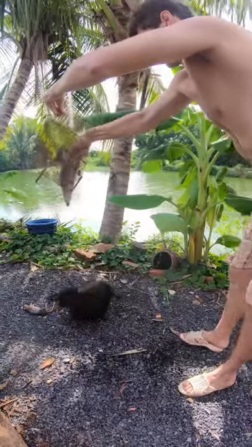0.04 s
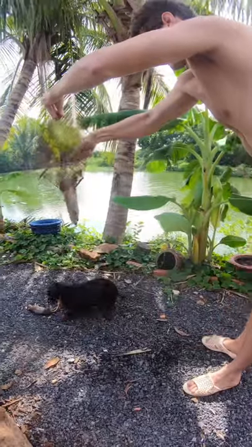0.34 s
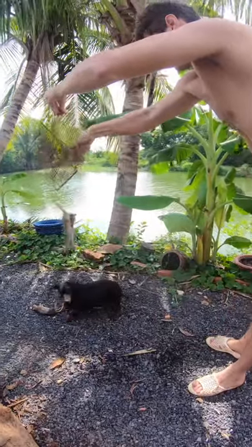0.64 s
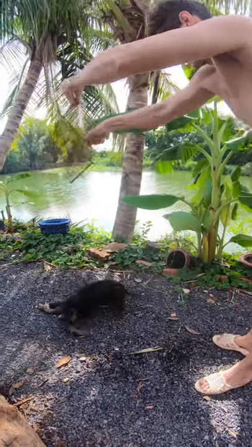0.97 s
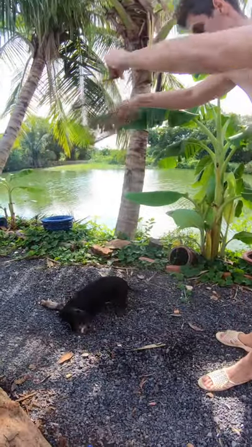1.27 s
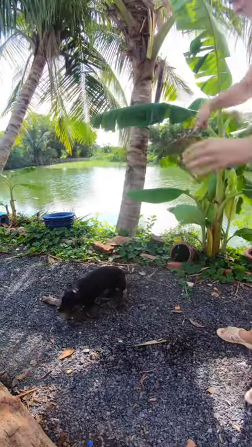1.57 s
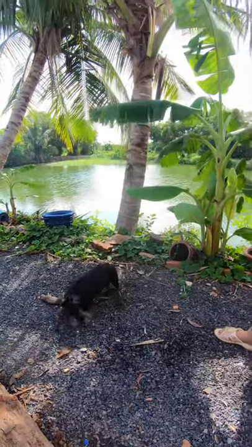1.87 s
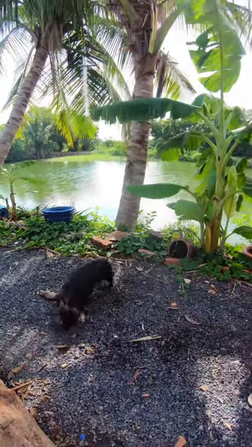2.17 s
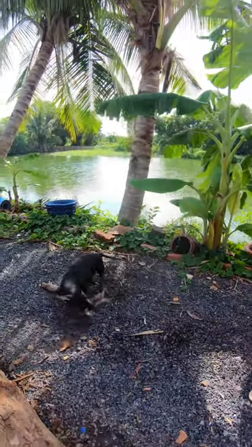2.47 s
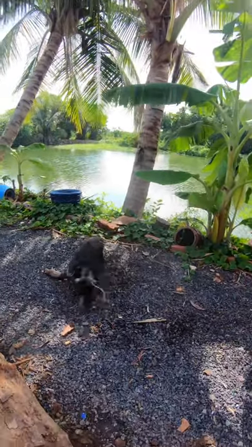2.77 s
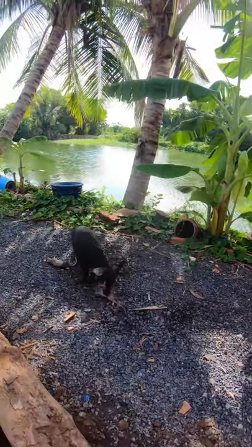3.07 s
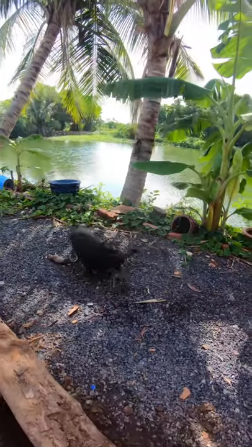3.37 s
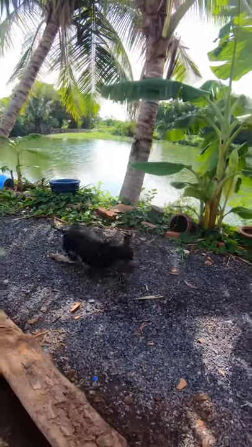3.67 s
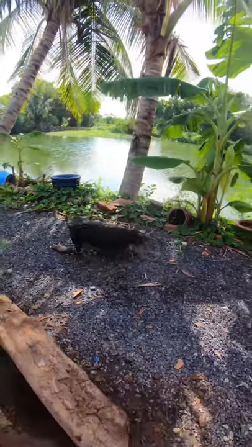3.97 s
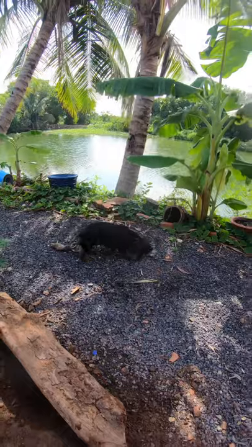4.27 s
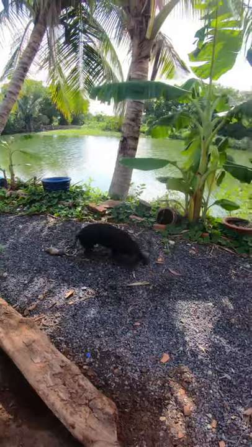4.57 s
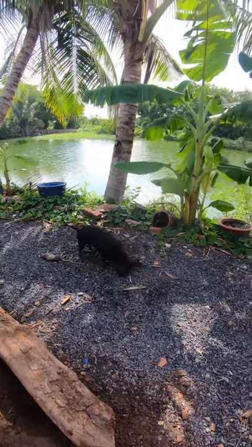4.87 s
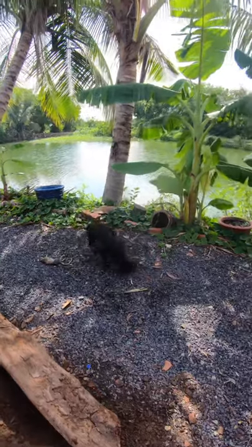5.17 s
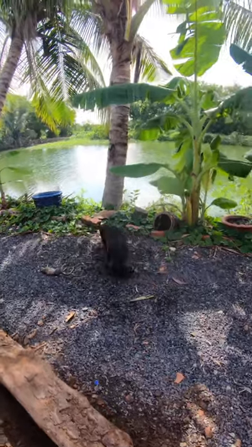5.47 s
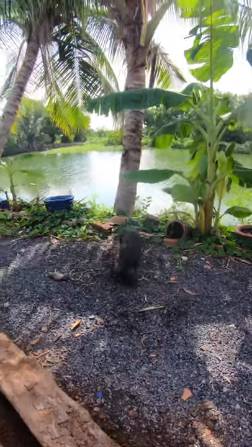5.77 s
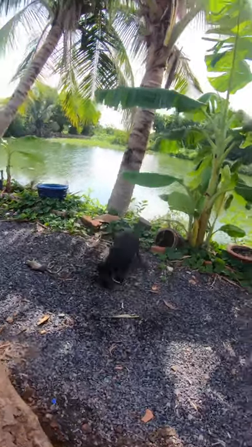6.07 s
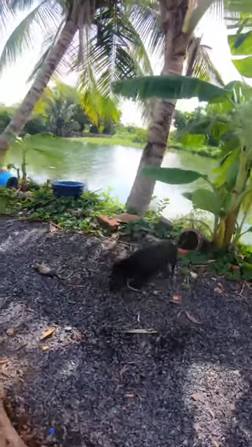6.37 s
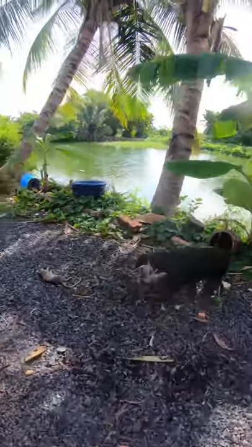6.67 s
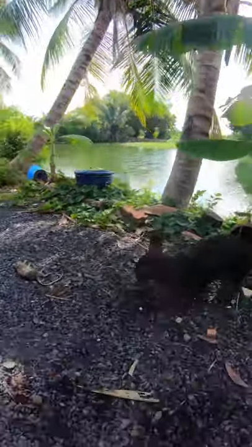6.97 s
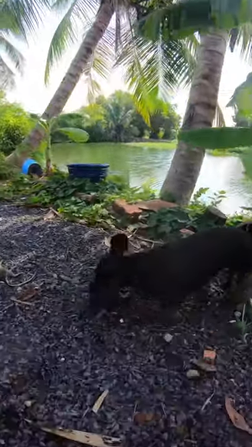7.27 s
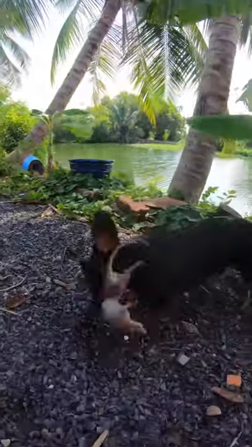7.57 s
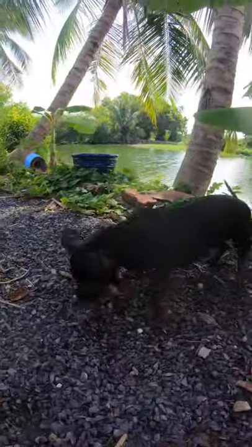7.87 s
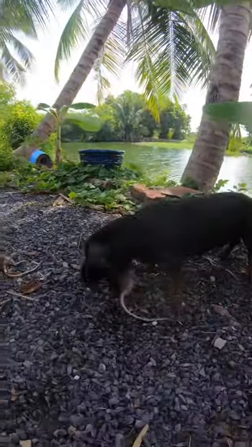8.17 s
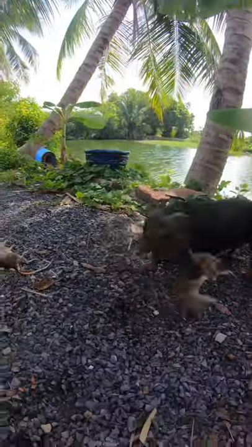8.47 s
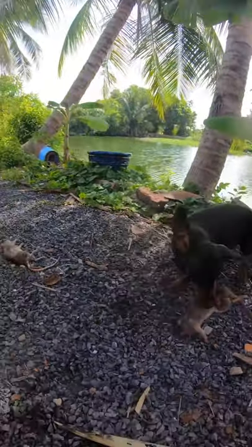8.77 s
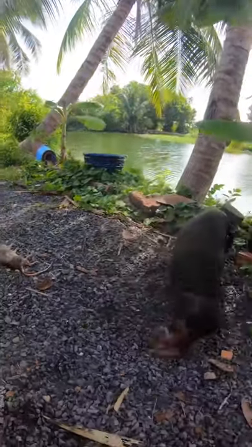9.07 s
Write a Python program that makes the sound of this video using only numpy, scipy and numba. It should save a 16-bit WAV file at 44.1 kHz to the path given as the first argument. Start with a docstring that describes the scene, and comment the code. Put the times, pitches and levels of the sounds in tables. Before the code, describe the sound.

A small dog fights a rat on a gravel path, a few steps from a hand-held phone and slightly left, over a quiet low rumble and a hush of foliage. Paws crunch lightly on gravel and dry leaves throughout. At about 1.1 seconds the rat gives a burst of high, hoarse squeals, followed by sharp clicks of bites and flung stones until 2 seconds. More raspy squeals come from 2 to 3.4 seconds, with scattered clicks and a soft thud. From about 4.7 to 6.2 seconds the cries are weaker, with tiny whistling notes. Around 5.7 to 6.2 seconds a finger rubs and bumps the phone's case, and the rumble swells briefly. From 6.6 to 7.8 seconds come dense sharp clicks, gravel scuffs and a few clipped squeaks. After a short lull, another flurry of clicks, scuffs and soft body thuds runs from 8.4 to 9 seconds, with faint last squeaks.

```python
"""Dog shaking a rat on gravel

A small dog seizes a rat on a gravel path and shakes it, a few steps from a hand-held phone.
The rat squeals hoarsely, then more weakly: irregular vocal pulses excite a throat resonance.
Bites and flung stones click, paws crunch gravel and dry leaves in showers of tiny impacts, bodies thud.
A finger sticks and slips on the phone's case, over a low outdoor rumble and a hush of foliage."""
import sys
import numpy as np
from scipy import signal
from scipy.fft import rfft, irfft
from scipy.io import wavfile
from scipy.ndimage import uniform_filter1d
from numba import njit

SR = 44100
rng = np.random.default_rng(int(sys.argv[2]) if len(sys.argv) > 2 else 0)


def put_to_file(sound):
    """Save the sound as 16-bit audio at rate SR, in the file named by the first command-line argument."""
    columns = np.atleast_2d(sound).T  # one column per channel
    safe = np.clip(columns, -1, 1)
    whole_steps = np.round(safe * 32767)
    wavfile.write(sys.argv[1], SR, whole_steps.astype(np.int16))


N = 402633
TIME = np.arange(N) / SR


def undb(db):
    """Amplitude ratio of a level in decibels."""
    return 10 ** (np.asarray(db) / 20)


def unit(x):
    """Normalisation to rms 1."""
    return x / np.sqrt(np.mean(x ** 2) + 1e-20)


def steady(x, size=700):
    """Gain control: the short-term rms is held at 1 and the fine grain remains."""
    return x / np.sqrt(np.abs(uniform_filter1d(x ** 2, size)) + 1e-12)


def curves(rows):
    """Linear interpolation of each column of a table through time."""
    s, *columns = np.transpose(rows)
    return [np.interp(TIME, s, c) for c in columns]


def add(track, s, sound):
    """Superposition of a sound on a track, from time s."""
    i = max(int(s * SR), 0)
    track[i:i + len(sound)] += sound[:max(N - i, 0)]


def colour(x, points, size=2048):
    """Minimum-phase filter through (f/Hz, gain/dB) points, by folding the cepstrum."""
    hz, db = np.transpose(points)
    bins = np.fft.rfftfreq(size, 1 / SR)
    gain = undb(np.interp(np.log(bins + 1), np.log(hz), db))
    cepstrum = irfft(np.log(gain))
    cepstrum[1:size // 2] *= 2
    cepstrum[size // 2 + 1:] = 0
    return signal.oaconvolve(x, irfft(np.exp(rfft(cepstrum))))[:len(x)]


@njit
def svf(x, hz, width):
    """State-variable band-pass with moving centre and bandwidth."""
    y, band, low = np.empty(len(x)), 0., 0.
    for i in range(len(x)):
        g, damping = np.tan(np.pi * hz[i] / SR), width[i] / hz[i]
        v = (band + g * (x[i] + 1e-18 - low)) / (1 + g * (g + damping))
        band, low, y[i] = 2 * v - band, low + 2 * g * v, damping * v
    return y


def resonate(x, hz, width_hz):
    """Second-order resonance with gain 1 at its centre."""
    return svf(x, hz * np.ones(len(x)), width_hz * np.ones(len(x)))


def walk(rate):
    """Random modulation of rms 1: ramps between values drawn rate times a second."""
    hold = max(int(SR / rate), 2)
    steps = np.repeat(rng.standard_normal(N // hold + 1), hold)
    return unit(uniform_filter1d(steps, hold)[:N])


def grains(rate, spread_db, size=N):
    """Poisson process of tiny impacts, many weak and a few strong."""
    chance, strength = rng.random(size), np.minimum(rng.exponential(size=size), 4)
    return unit((chance < rate / SR) * rng.choice([-1, 1], size) * undb(spread_db * strength))


# Gain of the difference signal between the two microphone ports: f/Hz, gain/dB
SIDE_GAIN = [(60, -15.5), (250, -13), (550, -5), (1000, -2.5), (2000, -4), (3600, -15), (6000, -1),
             (8000, -0.5), (12000, 0)]

def ports(mid, other, left_db):
    """Mid-side stereo: sound arriving by another path decorrelates left and right."""
    side = colour(other, SIDE_GAIN)
    return np.array([(mid + side) * undb(left_db / 2), (mid - side) * undb(-left_db / 2)])


# Course of the distant rumble: t/s, deep level/dB, drone level/dB
RUMBLE_LEVELS = [(0.0, -53.5, -52), (2.7, -55.5, -50.0), (3.7, -49, -47), (4.4, -52, -51),
                 (5.55, -53, -51.5), (6.1, -38.5, -44.5), (6.8, -42.5, -48), (7.9, -55, -47),
                 (8.7, -57.5, -44), (9.13, -50, -52)]
# Spectra of the deep rumble, the drone above it and the foliage: f/Hz, gain/dB
DEEP_SPECTRUM = [(15, -25), (30, -12), (48, 1), (70, -4.5), (100, -13), (200, -44.5), (800, -99)]
DRONE_SPECTRUM = [(45, -21.5), (75, 3), (100, 5.5), (170, 0.5), (220, -5), (310, -15), (420, -20.5),
                  (600, -37.5), (2500, -75)]
FOLIAGE_SPECTRUM = [(240, -7), (400, -18.5), (607, -6), (879, -8), (1060, -9), (1490, -5), (2430, -6.5),
                    (3930, -9), (7750, -11), (9760, -21.5), (16000, -40)]

def outdoors(foliage_db=-55.5):
    """Filtered noise with slow amplitude modulation: a distant rumble and the hush of foliage."""
    def bed(spectrum, db):
        pair = [unit(colour(rng.standard_normal(N), spectrum, size=8192)) * undb(db) for _ in range(2)]
        return ports(*pair, left_db=1.5)

    deep_db, drone_db = curves(RUMBLE_LEVELS)
    drone_db += 1.4 * walk(13)
    deep = bed(DEEP_SPECTRUM, deep_db + walk(5.5))
    drone = bed(DRONE_SPECTRUM, drone_db)
    return deep + drone + bed(FOLIAGE_SPECTRUM, foliage_db + 1.2 * walk(5))


def pebble_ticks(rate, low_hz=1500, high_hz=7000, width_hz=170, sizes=16):
    """Modal ringing: stones of many sizes knock together, each sounding two modes of its own."""
    out = np.zeros(N)
    for hz in np.geomspace(low_hz, high_hz, sizes) * rng.uniform(.9, 1.1, sizes):
        knocks = np.zeros(N)
        knocks[rng.integers(0, N, int(rate * N / SR / sizes))] = 1
        out += resonate(knocks, hz, width_hz) - resonate(knocks, 1.6 * hz, 2 * width_hz)
    return unit(out * undb(3 * walk(100)))


# How hard the paws work the ground: t/s, stone level/dB, leaf level/dB
SCUFFLE_LEVELS = [(0, -51.5, -43.5), (.1, -59, -56.5), (.3, -59.5, -59.5), (.86, -60.5, -80),
                  (.92, -51, -51), (1.1, -55.5, -54), (1.5, -52.5, -48), (1.92, -54.5, -59),
                  (2.1, -55.5, -51.5), (2.8, -50, -45.5), (3, -54, -54), (3.6, -54, -50),
                  (3.85, -60.5, -61.5), (4.55, -58.5, -56.5), (5, -57, -62), (6.55, -60, -57),
                  (6.7, -47, -47), (7.03, -55.5, -47), (7.7, -54, -45.5), (8.05, -62, -54.5),
                  (8.28, -68, -59), (8.55, -55, -47), (9.13, -61.5, -54.5)]
# Spectra of shifting stones and crackling leaves: f/Hz, gain/dB
STONE_SPECTRUM = [(200, 2), (350, 16), (550, 5.5), (900, 9), (1800, 3), (3300, 7), (5000, -2.5),
                  (9000, -41)]
LEAF_SPECTRUM = [(1500, -4), (3500, 8.5), (5000, 6), (6500, 6), (7900, 7.5), (9500, 4), (11500, -3),
                 (14000, -3), (16000, -29)]

def ground(spurt_s=0.008):
    """Shot noise: paws shift stones and crush leaves in sudden spurts that decay exponentially."""
    stone_db, leaf_db = curves(SCUFFLE_LEVELS)
    starts = np.abs(grains(40, 1.6))
    decays = signal.lfilter([1], [1, -np.exp(-1 / (spurt_s * SR))], starts)
    spurts = unit(1 + .95 * unit(decays))
    ticks = undb(-8) * pebble_ticks(rate=50)

    def crunch(rate, spread_db, spectrum, db):
        return unit(colour(grains(rate, spread_db) * spurts + ticks, spectrum)) * undb(db)

    stones = [crunch(1300, 1.6, STONE_SPECTRUM, stone_db) for _ in range(2)]
    leaves = [crunch(3400, 1.05, LEAF_SPECTRUM, leaf_db) for _ in range(2)]
    return ports(*stones, left_db=2.5) + ports(*leaves, left_db=-1.0)


# Bites, snapping twigs and struck stones:
# t/s, level/dB, ring f/Hz, body gain/dB, treble gain/dB, crumbling time/ms
IMPACTS = [(0.05, -23, 3950, -42, -14.5, 0.83), (0.897, -22, 3500, -28, -5, 2.4),
           (0.985, -27.5, 3800, -30, 3, 1.2), (1.44, -15.5, 1046, -16, -5.5, 2.6),
           (1.536, -10, 1080, -20.5, -9.5, 2.4), (1.637, -16.5, 1170, -21, -18, 2.4),
           (1.651, -6.5, 880, -27, -15, 2), (1.723, -11.5, 2760, -21, -18.5, 3.3),
           (1.751, -14, 2190, -12.5, -8.5, 3.7), (1.856, -19, 3020, -25, -20, 4.8),
           (1.877, -21, 2470, -17, -38, 2.8), (1.965, -17.5, 3320, -18, 7, 2.8),
           (1.972, -13, 3160, -22, 0, 6.7), (2.649, -5, 1114, -18, -12, 4.8),
           (2.814, -13, 3180, -16.5, -1, 2.1), (2.881, -7, 1200, -26.5, -19, 2.8),
           (3.224, -12.5, 3040, -37, -16, 1.4), (3.481, -16.5, 2660, -10.5, -18.5, 2.4),
           (3.542, -23, 4300, -26, -16, 2), (3.603, -16.5, 1970, -20, -31, 6.6),
           (3.611, -13.5, 2100, -26, -26, 1.6), (3.647, -12, 2960, -32, -2, 2.9),
           (3.816, -27.5, 1740, -24, -25, 1.8), (3.925, -29, 1800, -33, -22, 1.3),
           (4.076, -28.5, 2040, -10, -24, 2.5), (4.093, -25, 990, -18, -26, 1.2),
           (4.187, -27, 1140, -20, -12, 1), (4.435, -33, 1290, -4, -28, 2),
           (4.531, -22.5, 1850, -16, -6, 4.4), (6.668, -16.5, 2140, -25, -24, 2.5),
           (6.693, -11, 4870, -15, -9, 10), (6.78, -16.5, 2960, -36, -16.5, 1.6),
           (6.795, -11, 2300, -16, -17.5, 3), (6.832, -10, 3430, -19, -2, 12),
           (6.933, -11.5, 1206, -22.5, -25.5, 3.6), (6.956, -10.5, 3360, -15, -7, 5.9),
           (7.074, -6, 2260, -18, -14, 0.67), (7.189, -11.5, 3010, -12.5, -4, 4),
           (7.199, -12, 3420, -17, -13, 2.8), (7.289, -27, 2400, -7, -20, 1.5),
           (7.332, -14.5, 2760, -21, -5.5, 11), (7.397, -9, 2730, -10.5, -17.5, 1.4),
           (7.502, -5.5, 3220, -14, -5.5, 4.5), (7.55, -20, 4380, -27, -19, 2),
           (7.631, -3.5, 3580, -27.5, -5, 0.56), (7.645, -16, 3730, -19, -13, 2.5),
           (7.677, -26, 4200, -27, 1, 1.8), (7.77, -22, 10900, -23, 7, 2),
           (8.429, -20, 1320, -20, -11, 2.8), (8.464, -8.5, 3760, -18, -24, 2.4),
           (8.471, -4, 3260, -20, -13, 2.9), (8.518, -13.5, 3160, -26, -29, 2.8),
           (8.553, -19, 3180, -26, -37, 4.1), (8.608, -10, 3470, -15.5, -4.5, 4.2),
           (8.684, -12, 1440, -26, -20, 0.89), (8.78, -14, 3860, -26, -7, 5.4),
           (8.786, -15.5, 4200, -16, 4, 3), (8.886, -22, 3110, -21, -11.5, 2),
           (8.924, -19.5, 5500, -20, -4, 1.2)]

def clicks(crumble_db=-16, settle_db=-35, settle_s=0.026, size=4096):
    """Impulse excitation: a sharp break, crumbling contact and settling grit drive damped modes."""
    def struck(force, spectrum, hz):
        shaped = colour(force, spectrum)
        return shaped + undb(5) * resonate(shaped, hz, width_hz=900)

    out, t = np.zeros(N), np.arange(size) / SR
    tap = signal.unit_impulse(size)
    for s, db, hz, body_db, treble_db, crumble_ms in IMPACTS:
        crumble = undb(crumble_db) * grains(9000, 1.5, size) * np.exp(-1000 * t / crumble_ms)
        settle = undb(settle_db) * grains(3300, 0.9, size) * np.exp(-t / settle_s)
        spectrum = [(100, body_db + 0.5), (500, body_db + 0.5), (1000, body_db + 2.5),
                    (2200, -18), (4000, -22), (5600, treble_db - 10.5), (8000, treble_db - 11.5),
                    (11500, treble_db - 23.5), (16000, treble_db - 32)]
        crack = struck(tap + crumble + settle, spectrum, hz)
        for mode_hz in np.geomspace(3000, 7500, 3) * rng.uniform(.8, 1.25, 3):
            crack = crack - undb(8.5) * resonate(crack, mode_hz, width_hz=420)
        clean = struck(tap, spectrum, hz)
        crest_factor = np.abs(clean).max() / clean.std()
        add(out, s, undb(db) * unit(crack) / crest_factor)
    return out


# Paws scuffing gravel and leaves: t/s, level/dB, centre f/Hz, decay time/s
PAW_PUSHES = [(0.121, -46.5, 1440, 0.077), (0.904, -42, 4930, 0.033), (0.142, -50, 6600, 0.069),
              (1.113, -47, 1560, 0.049), (2.444, -42.5, 7450, 0.034), (2.889, -39.5, 5160, 0.031),
              (3.003, -40, 2020, 0.014), (3.519, -42.5, 5000, 0.017), (4.193, -55.5, 7500, 0.073),
              (4.514, -51, 1800, 0.044), (5.277, -36.5, 1090, 0.029), (5.329, -45.5, 1110, 0.035),
              (5.584, -42, 1500, 0.026), (6.462, -52, 833, 0.11), (7.06, -43, 1530, 0.11),
              (7.285, -45.5, 1400, 0.05), (7.438, -41, 1790, 0.017), (7.204, -39.5, 6500, 0.04),
              (7.364, -46.5, 5470, 0.089), (7.428, -40.5, 6500, .025), (7.507, -38.5, 7100, 0.034),
              (7.647, -40, 6800, 0.065), (7.836, -39, 5600, 0.037), (6.899, -38.5, 2850, 0.023),
              (8.398, -47, 1820, 0.039), (8.409, -43, 8000, .016), (8.499, -42, 3500, 0.024),
              (8.594, -34, 7440, 0.027), (8.692, -48, 2000, 0.013), (8.891, -44, 5050, 0.038),
              (8.94, -45, 2800, 0.027)]

def scuffs(grain_rate=900, relative_width=2.4, attack_s=0.0034, size=8192):
    """Granular flow: each push of a paw sets off a short slide of small stones."""
    out, t = np.zeros(N), np.arange(size) / SR
    for s, db, hz, length in PAW_PUSHES:
        slide = grains(grain_rate, spread_db=0, size=size)
        for _ in range(3):
            slide = resonate(slide, hz, relative_width * hz)
        envelope = np.exp(-(t / length) ** 2) * (1 - np.exp(-t / attack_s))
        add(out, s, undb(db) * steady(slide, size=1200) * envelope)
    return colour(out, [(8500, 1.0), (11500, -3.5), (16000, -5)])


# The rat's cries: t/s, hold/s, attack/s, level/dB, swell/dB, first f/Hz, last f/Hz,
# throat bandwidth/Hz, relative hiss level/dB
SQUEALS = [(0.242, 0.014, .006, -52.5, 1, 3950, 3900, 120, -20),
           (0.272, .03, 0.0034, -55.5, 2, 3250, 3900, 130, -20),
           (1.146, 0.038, 0.053, -30, -1, 4250, 3900, 604, -24),
           (1.19, 0.04, 0.0086, -30.5, -2.5, 3950, 4164, 620, -9.5),
           (1.232, 0.045, 0.009, -31, 0.5, 3620, 3430, 520, -5.5),
           (1.277, 0.053, .0056, -25.5, -2, 3380, 3310, 480, -13.5),
           (1.327, 0.0142, 0.0036, -31, -5, 3076, 2747, 250, -11),
           (1.394, 0.016, 0.007, -36, -6, 3900, 3900, 1500, -3),
           (2.04, 0.019, .03, -32.5, 0, 3520, 3460, 800, -9),
           (2.164, 0.061, 0.018, -26, -3.5, 3480, 3690, 622, -7),
           (2.225, 0.053, .008, -25.5, 4.5, 3620, 3950, 604, -7),
           (2.286, 0.033, 0.005, -29, -8, 3950, 4040, 600, -8),
           (2.519, .048, .0015, -25.5, -3, 3680, 3300, 520, -13.5),
           (2.594, 0.064, 0.013, -29.5, -5, 3220, 3480, 596, -8.5),
           (2.677, .026, 0.0094, -30, -3, 3600, 3500, 681, -12),
           (2.745, 0.035, .0015, -24.5, -3.5, 3450, 3590, 559.5, -17.5),
           (3.034, .026, 0.0039, -41.5, -3, 3600, 3440, 950, -5),
           (3.128, 0.027, .003, -40, 2, 3250, 3130, 752, -13),
           (3.185, 0.041, 0.0055, -31, 0, 3360, 3360, 624, -7),
           (3.268, 0.094, 0.0093, -46.5, -14, 3550, 3370, 650, -10),
           (3.357, 0.043, .0016, -30, 1, 3400, 3464, 548, -18),
           (3.91, 0.016, 0.0039, -46.5, 2.5, 3550, 3440, 550, -17),
           (4.155, 0.01, 0.0054, -50, -3.5, 4850, 4790, 159.6, -3),
           (4.755, 0.05, .015, -48, 6, 3080, 3190, 400, -18),
           (4.815, 0.05, 0.0074, -42.5, 1.5, 3458, 3450, 400, -15),
           (4.875, 0.091, .008, -42.5, 0, 3330, 3150, 341, -18),
           (4.965, 0.039, 0.0066, -48.5, -12.5, 3130, 3140, 331, -14),
           (5.172, 0.09, .012, -43.5, -6, 3100, 2840, 350, -16),
           (5.695, 0.097, 0.024, -49.5, -4, 3060, 2986, 417, -27.5),
           (5.808, 0.063, 0.023, -48, -3, 3450, 3550, 580, -8),
           (5.895, .036, .016, -44.5, -7, 3000, 2954, 420, -20),
           (6.128, 0.11, .013, -45, -2, 3600, 2860, 419, -15.5),
           (6.564, .0068, 0.0041, -35, -4, 3450, 3370, 600, -19),
           (6.585, 0.0065, 0.0029, -33.5, -2, 3500, 3380, 600, -18.5),
           (6.639, 0.01, 0.0066, -26.5, 2, 3000, 3000, 809, -2.5),
           (6.787, 0.0074, .0048, -30.5, -3, 2800, 2843, 651, -22),
           (6.975, 0.0086, 0.0027, -31.5, -7, 3320, 3300, 550, -11),
           (8.347, .0036, 0.0051, -38.5, 3, 3200, 3220, 600, -9),
           (8.811, 0.026, 0.0028, -39, -7, 3600, 2950, 480, -11),
           (8.995, 0.032, .012, -46, 3, 3250, 3240, 450, -19)]

def cry_contours(release_s=0.005, sag_hz=120, tail_db=-14, tail_s=0.037, arch_db_per_s=37):
    """Attack, gliding hold and release: the loudest cry sets pitch, level, bandwidth and hiss."""
    hz, width = np.full(N, float(SQUEALS[0][5])), np.full(N, float(SQUEALS[0][7]))
    db, hiss_db = np.full(N, -120.), np.zeros(N)
    for s, held, attack, level_db, swell_db, first_hz, last_hz, width_hz, breathy_db in SQUEALS:
        on = slice(int((s - attack / 2) * SR), int((s + held + .5) * SR))
        t = TIME[on] - s
        along, after = np.clip(t / held, 0, 1), np.maximum(t - held, 0)
        release = np.exp(-after / release_s)
        tail = undb(tail_db) * np.exp(-after / tail_s)
        envelope = np.clip(t / attack + .5, 0, 1) * np.maximum(release, tail)
        loud_db = level_db + swell_db * (along - .5) + 20 * np.log10(envelope + 1e-5)
        pitch = first_hz + (last_hz - first_hz) * along - sag_hz * (1 - release)
        harsh_db = breathy_db + arch_db_per_s * held * np.sin(np.pi * along)  # harshest in mid-cry
        leads = loud_db > db[on]
        for track, value in ((hz, pitch), (db, loud_db), (width, width_hz), (hiss_db, harsh_db)):
            track[on] = np.where(leads, value, track[on])
    return hz, db, width, hiss_db


# Spectrum of the rat's breath: f/Hz, gain/dB
BREATH_SPECTRUM = [(1000, -11), (2000, -6.5), (2800, 0.5), (4500, 4), (5500, 0), (6800, 1.5), (8000, 6),
                   (9200, -5.5), (10500, -25), (15000, -27)]
# Moments when the voice locks into a clean whistle: centre t/s, half length/s, level/dB
WHISTLE_LOCKS = [(1.318, 0.011, -20.5), (4.794, .003, -37.5), (4.95, 0.0056, -28.5), (5.247, .012, -31.5),
                 (5.725, 0.011, -38.5), (5.78, 0.019, -45.5), (5.925, 0.0037, -33), (6.138, .005, -37),
                 (6.207, .016, -41)]

def rat(flutter_hz=430, jitter=0.4, shudder_hz=143, shudder_db=2, rasp_under_whistle=0.32):
    """Source and filter: irregular vocal fold slaps ring a moving resonance; at times it whistles."""
    hz, db, width, hiss_db = cry_contours()
    cycle = np.cumsum(flutter_hz * np.exp(jitter * walk(400))) / SR
    force = undb(4.5 * walk(260))
    slaps = unit(np.diff(np.floor(cycle), prepend=0) * force)
    air = unit(rng.standard_normal(N) * force * np.exp(-(cycle % 1)))
    drive = slaps + undb(-2) * air
    centre = hz * np.exp(.022 * walk(170) + .01 * walk(60))
    core, skirt = (steady(svf(svf(drive, centre, w), centre, w)) for w in (width, 2.3 * width))

    shudder_phase = 2 * np.pi * np.cumsum(shudder_hz * np.exp(0.12 * walk(60))) / SR
    shudder = unit(undb(shudder_db * np.sin(shudder_phase)))  # the hoarse voice pulses
    phase = 2 * np.pi * np.cumsum(hz * np.exp(0.01016 * walk(300))) / SR
    thread = unit(np.sin(phase) * walk(120))  # a broken trace of pitch inside the rasp
    ragged = unit(undb(1.64 * walk(110)))
    rasp = steady(core + undb(-15) * skirt + undb(-6) * thread, size=300) * shudder * ragged
    hiss = steady(colour(air, BREATH_SPECTRUM), size=200) * undb(hiss_db) * shudder

    tone = unit(np.sin(phase) + undb(-24) * np.sin(2 * phase))
    whistle, rasp_share = np.zeros(N), np.ones(N)
    for s, half_length, level_db in WHISTLE_LOCKS:
        lock = np.exp(-((TIME - s) / half_length) ** 2)
        whistle += undb(level_db) * lock * tone
        rasp_share -= (1 - rasp_under_whistle) * lock
    return undb(db) * (rasp_share * rasp + hiss) + whistle


def blows(rows, sag, noise_db, size=8192):
    """Damped oscillation with a band of noise; sag lowers the pitch as the contact relaxes."""
    out, t = np.zeros(N), np.arange(size) / SR
    for s, db, hz, t60 in rows:
        pitch = hz * (1 + sag * (np.exp(-3 * t / t60) - .5))
        swing = np.sin(2 * np.pi * np.cumsum(pitch) / SR)
        noise = unit(resonate(resonate(rng.standard_normal(size), hz, 2 * hz), hz, 2 * hz))
        envelope = np.exp(-np.log(1000) * t / t60) * (1 - np.exp(-t * hz))
        blow = (swing + undb(noise_db) * noise) * envelope
        add(out, s, undb(db) * blow / np.abs(blow).max())
    return out


# Paws and bodies landing: t/s, peak level/dB, f/Hz, T60/s
LANDINGS = [(1.315, -39, 330, 0.11), (1.640, -19.5, 252, 0.0083), (2.650, -19.5, 370, 0.03),
            (2.651, -23, 214.4, 0.019), (6.926, -24, 326, 0.0084), (7.088, -29, 415, 0.11),
            (7.458, -25.5, 258, 0.027), (8.412, -27, 295, 0.045), (8.421, -21, 127, 0.021),
            (8.521, -23, 278, 0.023), (8.525, -26, 95, 0.038), (8.555, -23, 126, 0.018),
            (8.666, -36.5, 236, 0.052), (8.686, -26, 208, 0.009)]

def thuds():
    """Inelastic impact: soft bodies land with a few heavily damped swings."""
    return blows(LANDINGS, sag=0.32, noise_db=-9)


# A finger catching on the case: t/s, relative level/dB, half length/s
FINGER_RUBS = [(5.678, -46, 0.013), (5.718, -41.5, 0.021), (5.766, -35.5, 0.018), (5.79, -44, 0.042),
               (5.85, -33, 0.012), (5.867, -29, 0.01), (5.924, -37, 0.012), (5.978, -27.5, 0.012),
               (6.003, -32, 0.073), (6.051, -23, 0.02), (6.084, -21, 0.04), (6.135, -27, 0.013),
               (6.329, -41, 0.016)]
# The finger pressing air into a port: t/s, relative peak level/dB, f/Hz, T60/s
FINGER_PRESSES = [(5.732, -25, 59, 0.1), (5.752, -31, 84, 0.12), (5.873, -13, 237, 0.013),
                  (5.877, -15, 90, 0.035), (6.058, -13, 51.7, 0.095), (6.142, -11, 46, 0.044)]

def finger(case_hz=1240, rub_gain=12 * undb(-2)):
    """Stick-slip friction rings the phone's case; it rocks, so the two ports move in antiphase."""
    pressure = np.zeros(N)
    for s, db, length in FINGER_RUBS:
        t = np.arange(int(3 * length * SR)) / SR
        add(pressure, s, undb(db) * np.exp(-(t / length) ** 2))
    slips = grains(1800, 1.9) * pressure
    ring = resonate(resonate(slips, case_hz, width_hz=330), case_hz, width_hz=145)
    scrape = colour(slips, [(60, 2), (300, -19.5), (550, -14), (900, -28), (1800, -22), (2250, -18.5),
                            (2800, -30), (3500, -27), (4300, -44), (7700, -40), (12000, -74)])
    rub = rub_gain * (ring + scrape)
    puffs = undb(-4) * blows(FINGER_PRESSES, sag=0.59, noise_db=-13.5)
    left = undb(3.5) * rub + puffs
    right = -np.roll(rub, 2) - undb(-1) * np.roll(puffs, 90)
    return np.array([left, right])


# A knock on a hard pebble: t/s, peak level/dB, f/Hz, T60/s
PEBBLE_KNOCK = [(8.7803, -14.5, 3860, 0.0078)]

def ringing_pebble():
    """Free vibration: a hard pebble rings briefly at constant pitch."""
    return blows(PEBBLE_KNOCK, sag=0, noise_db=-10)


def trees(x, echo_db=-19, t60=0.15, delay_s=0.004, size=16384):
    """Diffuse scattering from the ground and trunks gives each port its own weak tail."""
    t = np.arange(size) / SR
    tails = rng.standard_normal((2, size)) * np.exp(-np.log(1000) * t / t60) * (t > delay_s)
    echoes = [signal.oaconvolve(x, tail / np.linalg.norm(tail))[:N] for tail in tails]
    return undb(echo_db) * np.array(echoes)


# Bearing of the fight, a little to the left: t/s, left minus right level/dB
FIGHT_BALANCE = [(2.2, 3), (4, 0.9), (9, 2)]

def scene(bounce_s=0.0048, size=1024):
    """Superposition of the fight, its reflections, the ground, the finger and the outdoor noise."""
    fight = rat() + clicks() + scuffs() + thuds() + ringing_pebble()
    # paths off the ground and hand reach the two ports differently
    bounce = rng.standard_normal(size) * np.exp(-np.arange(size) / SR / bounce_s)
    scattered = signal.oaconvolve(fight, bounce / np.linalg.norm(bounce))[:N]
    placed = ports(fight, scattered, left_db=curves(FIGHT_BALANCE)[0])
    return placed + trees(fight) + ground() + finger() + outdoors()


# Treble resonances of the microphone ports: f/Hz, gain/dB
PORT_RESPONSE = [(4500, 0), (5600, -1.5), (7000, -0.5), (7850, 2), (8400, -2), (9200, 1.5), (11500, -2.5)]

def record(dry):
    """Frequency response of the phone: port resonances, then a steep low-pass at 16 kHz."""
    heard = np.array([colour(channel, PORT_RESPONSE) for channel in dry])
    return signal.sosfilt(signal.ellip(10, .2, 80, 16000, fs=SR, output="sos"), heard)


dry = scene()
out = record(dry)
put_to_file(out)
```